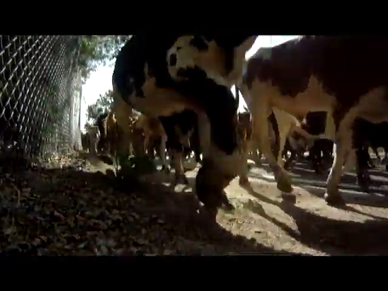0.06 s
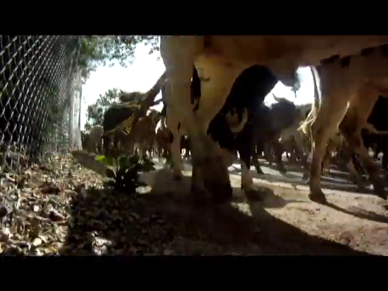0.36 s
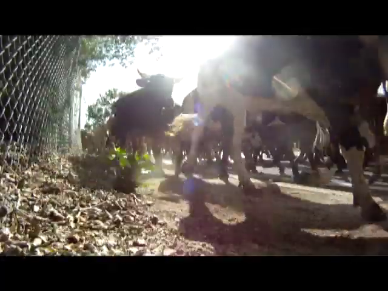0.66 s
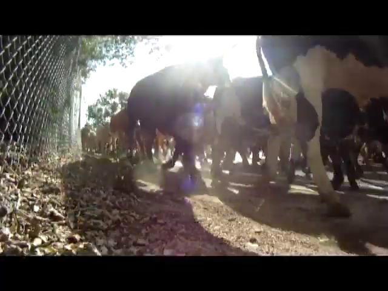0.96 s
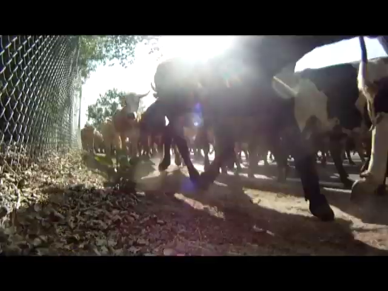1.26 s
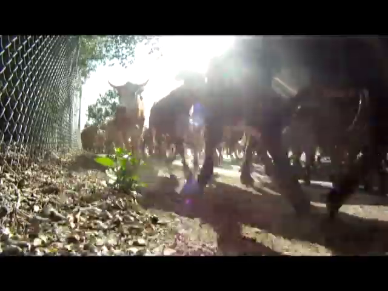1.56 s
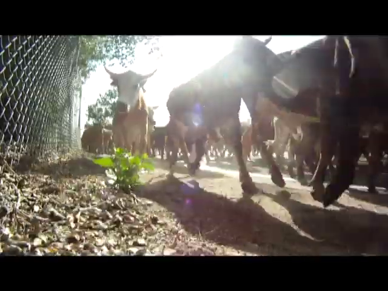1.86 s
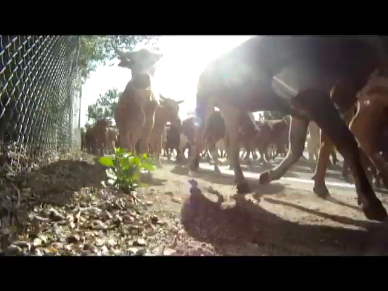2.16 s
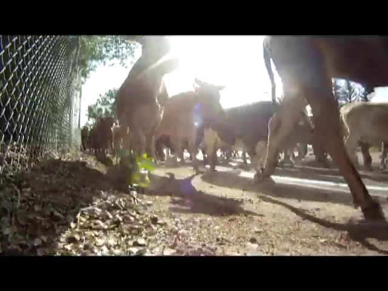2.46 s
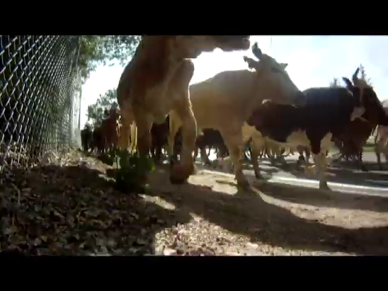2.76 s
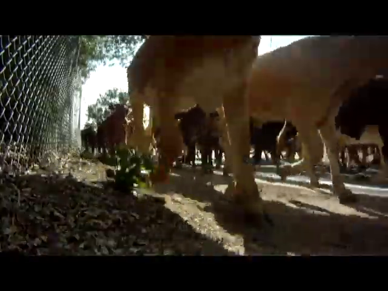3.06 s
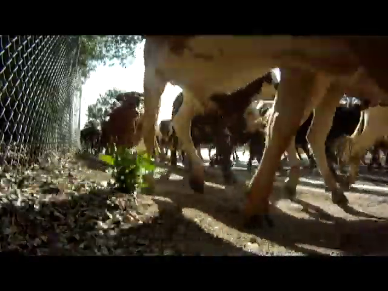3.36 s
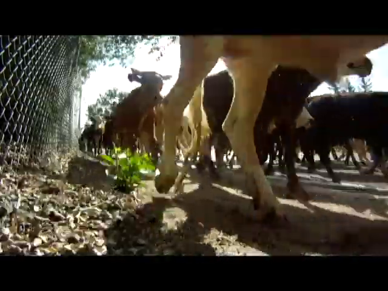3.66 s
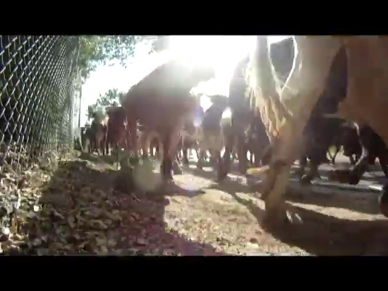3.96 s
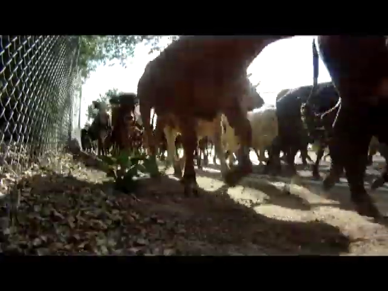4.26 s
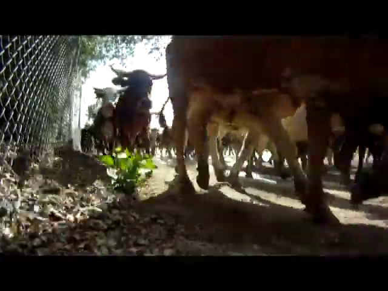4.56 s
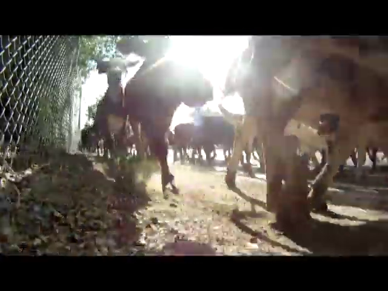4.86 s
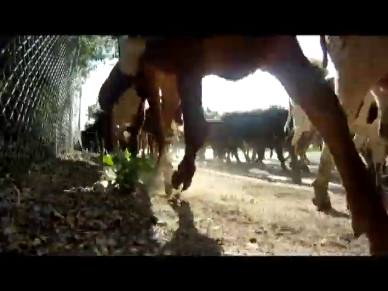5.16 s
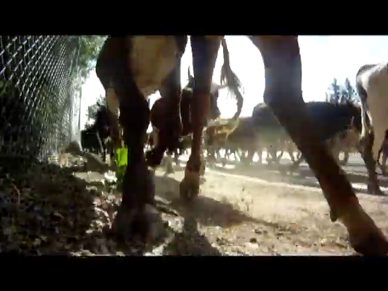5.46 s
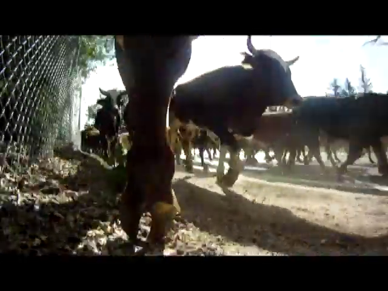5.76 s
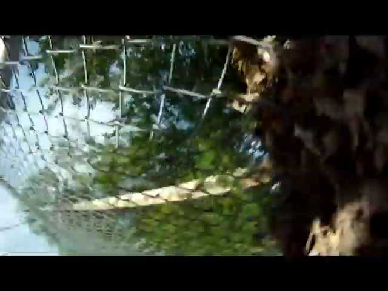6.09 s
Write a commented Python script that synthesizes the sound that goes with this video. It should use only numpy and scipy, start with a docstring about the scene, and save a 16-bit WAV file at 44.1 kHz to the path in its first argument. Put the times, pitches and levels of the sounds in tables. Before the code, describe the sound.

A herd of cattle streams past a microphone lying on the ground at a roadside. Near hooves thud into the soil and clack and crunch on grit, while many more clatter on the pavement behind and the ground rumbles. At the very end a hoof kicks the microphone: its case knocks loudly, a fence wire hums briefly and dry leaves crackle against it.

```python
"""Steers passing a roadside camera

A herd of steers streams past a small cased camera lying on the ground. Near hooves thud through the
soil and clack on grit; the rest of the herd clatters on the pavement behind, and the ground trembles.
At the end a hoof kicks the camera: it tumbles against a wire fence and slides through dry leaves."""
import sys
import numpy as np
from scipy import signal
from scipy.fft import rfft, irfft, next_fast_len
from scipy.io import wavfile
from scipy.ndimage import uniform_filter1d, map_coordinates

SR = 44100
rng = np.random.default_rng(int(sys.argv[2]) if len(sys.argv) > 2 else 0)


def store_wav(level_fs):
    """Save 16-bit WAV to argv[1]."""
    pcm = np.round(np.clip(np.atleast_2d(level_fs), -1, 1) * 32767)
    wavfile.write(sys.argv[1], SR, pcm.T.astype(np.int16))


N = 279153


# a near steer's weight landing on the soil: t/s, level/dB, f/Hz, heel bump/dB
FOOTFALLS = [(0.101, -32.5, 106, -44), (0.162, -28.5, 70.6, -62), (0.272, -31, 87, -58),
             (0.354, -25.5, 105, -32.5), (0.429, -33, 87.5, -50), (0.608, -23, 83, -37.5),
             (0.767, -28, 83.4, -66), (0.978, -29.5, 72, -46), (1.072, -27.5, 92, -56),
             (1.117, -30, 81.6, -62), (1.312, -31.5, 70, -65), (1.413, -29, 90, -44),
             (1.706, -26.5, 100, -43.5), (1.814, -25, 91.4, -59), (2.018, -24, 87, -39.5),
             (2.059, -25.5, 89, -56), (2.31, -33.5, 91, -43.5), (2.633, -29, 92.3, -44.5),
             (2.956, -32, 81, -48), (3.132, -28.5, 72, -51), (3.25, -28.5, 85, -54),
             (3.463, -24.5, 108.5, -30), (3.616, -37, 91, -41), (3.784, -32.5, 90, -51),
             (4.028, -42, 103, -34.5), (4.284, -23, 93, -49), (4.428, -29, 80.5, -68),
             (4.574, -28, 78.5, -43), (4.878, -26.5, 105.5, -41), (4.986, -21.5, 89, -33.5),
             (5.209, -32.5, 104, -41), (5.318, -23, 68.5, -33.5), (5.579, -24.5, 58, -48),
             (5.644, -33, 101, -31.5), (5.892, -26.5, 80, -32.5), (5.952, -27, 59, -34)]

def thuds(far_steps_per_s=9, far_db=-35.5):
    """The soil carries each footfall as a short, low wave that swells and sinks in pitch."""
    track = np.zeros(N)
    t = np.arange(-SR // 20, SR // 10) / SR
    # animals farther off add softer steps at uneven times
    count = int(far_steps_per_s * N / SR)
    farther = [((k + 0.301 * late) / far_steps_per_s, far_db + 3 * weight, 80 + 12 * pitch, far_db - 17)
               for k, (late, weight, pitch) in enumerate(rng.standard_normal((count, 3)))]
    for s, db, hz, heel_db in list(FOOTFALLS) + farther:
        swell = 2 / (np.exp(-t / 0.0071) + np.exp(t / 0.0089))
        wave = swell * np.sin(2 * np.pi * (hz * (t - 3.4 * t ** 2) + rng.random()))
        # the heel gives a shorter, higher bump
        heel_cycles = rng.uniform(142, 206) * (t - 3 * t ** 2) + rng.random()
        bump = np.exp(-(t / 0.0081) ** 2) * np.sin(2 * np.pi * heel_cycles)
        add(track, s + t[0], amp(db) * wave + amp(heel_db) * bump)
    return track


# near hooves striking: t/s, level/dB, hoof's ring f/Hz, hollow knock/dB, stony brightness/dB
HOOF_STRIKES = [(0.0826, -42, 2360, -19, -5), (0.1223, -45.5, 2020, 0, 7), (0.1735, -44, 2600, 4, 4.5),
                (0.2095, -34, 2010, -10, 0), (0.3379, -36, 2320, -2, 10.5), (0.3773, -47, 2400, 4, 19),
                (0.4574, -45, 2180, -15, 1), (0.5781, -37.5, 2100, 0, -4), (0.7357, -48, 2430, -8, -5),
                (0.8786, -38, 2260, 13.5, -5), (0.9225, -46, 1930, -7, -7), (1.057, -37.5, 2080, 7, 3),
                (1.1428, -37.5, 2290, 0, 1), (1.257, -45, 1710, -15, 4), (1.5872, -34.5, 2330, -7, 7),
                (1.7903, -44, 2130, -19, -14), (2.068, -38, 2440, -2, 0), (2.1032, -38.5, 1520, -2, -1),
                (2.3637, -32.5, 2530, -16, 2), (2.4229, -36, 2050, -20, -6), (2.4877, -43, 2320, 1, 6),
                (2.635, -42.5, 2000, -15, 4), (2.7106, -38.5, 2040, -16, 0), (2.9118, -43, 2300, -4, 3),
                (3.0793, -41.5, 1960, -21, -7), (3.1407, -43, 1750, -8, -10),
                (3.2889, -45.5, 2260, -11, -9), (3.3872, -45, 2090, 1, -3), (3.4296, -39, 2100, 0, -4),
                (3.5294, -47, 2380, -14, 8), (3.5907, -43.5, 2300, -9, 3), (3.7594, -41, 2480, -5, 1),
                (3.9574, -45, 2400, -5, 4), (4.0153, -45.5, 2120, -22, 5), (4.1318, -44, 2040, -20, -4),
                (4.2297, -36.5, 1850, -7, -10), (4.276, -40.5, 2400, -9, -3), (4.4076, -38.5, 1800, -15, 6),
                (4.6994, -44, 1920, -6, -11), (4.811, -37.5, 2400, -5, -11), (4.849, -45, 1820, -11, -7),
                (5.0056, -45.5, 1710, -13, 5), (5.2545, -42.5, 2000, -11, 7), (5.2923, -39, 2280, 7, 3),
                (5.466, -41, 2700, 2, 18), (5.518, -41.5, 1620, -3, 11), (5.6818, -40, 1530, -2, -1),
                (5.859, -46, 1900, -15, 12)]

def near_hooves(soft_step_db=-41):
    """Single steps close by sound hollow on soil and bright on stones."""
    track = np.zeros(N)
    for s, db, ring_hz, knock_db, bright_db in HOOF_STRIKES:
        # a loud, bright step on stone crunches less than one on loose grit
        crunch_db = 2.5 - 1.5 * (db - soft_step_db) - 0.9 * max(bright_db, 0)
        step = hoof(ring_hz, knock_db, bright_db, crunch_db, fade_s=0.013, second_toe_db=-11.5)
        add(track, s, amp(db) * step)
    return track


def hoof(ring_hz, knock_db, bright_db, crunch_db, fade_s, second_toe_db):
    """One step: the two hard toes of a split hoof land in turn, and grit crunches under them."""
    t = np.arange(SR // 12) / SR
    grains = np.repeat(rng.standard_normal(len(t)), SR // 900)[:len(t)]
    crunch = amp(-60 * t / 0.18 + 2.2 * grains) * rng.standard_normal(len(t))
    force = amp(crunch_db) * crunch / np.linalg.norm(crunch)
    add(force, 0, contact(fade_s))
    add(force, rng.uniform(0.0024, 0.009), amp(second_toe_db) * contact(fade_s))
    ring = lambda hz: 1 + 2.5 * resonance(hz, ring_hz, 187)
    # the ground's tone: f/Hz, level/dB
    ground = [(150, knock_db - 4), (400, knock_db), (1000, knock_db), (1500, 0.0026), (3000, 0.029),
              (5500, bright_db), (7500, bright_db), (10000, bright_db * 0.043)]
    step = coloured(force, lambda hz: clatter_tone(hz) * ring(hz) * tone(ground, hz))
    power = uniform_filter1d(step ** 2, SR // 300)
    return step / np.sqrt(power.max())


# blows on the case, levels before its tone is added: t/s, crack/dB, hollow knock/dB, shove/dB, contact/s
BLOWS = [(5.9681, -18, -19, 3, 0.0068), (5.9696, 4, 0.5, -3.5, 0.002), (5.9719, -17, 7.5, -30, 0.0049),
         (6.0448, -19, -11, -1, .0026), (6.0542, -25.5, -13, -8, 0.00064), (6.0816, -6, -3, -1, .0011),
         (6.0902, -17.5, -29, -4.5, 0.00057), (6.165, -41, -41, -31, .0015),
         (6.184, -31, -32, -21, 0.00066), (6.222, -50, -45, -15, 0.0087), (6.247, -19, -25, -29, .0006),
         (6.266, -22.5, -35, -43, 0.0005), (6.324, -20, -19, -18, 0.001)]
# the tone of the case's hard shell: f/Hz, level/dB
SHELL_TONE = [(30, 3), (250, -6.5), (410, -8.5), (740, -1), (1100, 0), (2000, 3.5), (2750, -2),
              (4400, -9.5), (6200, -22.5), (7800, -13), (9400, -7.5), (11000, -14), (12000, -37),
              (13000, -15)]
# the notes the shell rings at: f/Hz, width/Hz, level/dB
SHELL_NOTES = [(265, 79, -29), (710, 79, 3), (1870, 360, -5.5), (2658, 195, 3.5), (3670, 690, -10.5),
               (9240, 160, -6)]
# the tone of the air inside the case: f/Hz, level/dB
HOLLOW_TONE = [(40, -16), (140, 3), (290, 5), (410, -11), (560, 2), (850, 3), (1150, -8.5), (2500, -27.5),
               (8000, -41)]

def tumbling_case(fade_s=0.012, tap_s=0.00097):
    """Blows shove the case and knock on the air inside; both blows and leaves make its shell ring."""
    cracks, rings, knocks, shoves = np.zeros((4, N))
    t = np.arange(SR // 10) / SR
    strength = np.sqrt(SR * fade_s / np.log(1e6))
    for s, crack_db, knock_db, shove_db, contact_s in BLOWS:
        crack = amp(crack_db) * strength * contact(fade_s)
        add(cracks, s, crack)
        # a long press muffles the shell; a quick tap lets it ring
        ring_db = 5.5 - 26 * np.log10(contact_s / tap_s)
        add(rings, s, amp(ring_db) * crack)
        add(knocks, s, amp(knock_db) * strength * contact(fade_s))
        add(shoves, s, -amp(shove_db) * np.sin(np.pi * t / contact_s) * (t < contact_s))
    hollow = amp(12.5) * coloured(knocks, lambda hz: tone(HOLLOW_TONE, hz))
    # the microphone cannot hold a steady push, so each shove swings back
    shoves = signal.lfilter(*signal.butter(1, 32, "highpass", fs=SR), shoves)
    rasp = dry_leaves()
    shell = amp(11) * coloured(cracks + rasp, lambda hz: tone(SHELL_TONE, hz) + amp(1.5) * window(hz))
    notes = lambda hz: sum(amp(db) * resonance(hz, centre, width) for centre, width, db in SHELL_NOTES)
    ring = amp(9.5) * coloured(rings + rasp, notes)
    return shell + ring + hollow + shoves


# how hard the leaves scrape the case: t/s, level/dB
LEAF_SCRAPE = [(6.155, -90), (6.176, -44.5), (6.186, -26.5), (6.25, -24), (6.28, -43.5), (6.318, -36.5),
               (6.33, -22.5)]

def dry_leaves():
    """Leaves snap in clumps as the case drags over them."""
    snaps = rng.standard_normal(N) * amp(1.6 * wobble(1200) + 2.2 * wobble(220))
    return loudness(LEAF_SCRAPE) * unit(snaps)


# the hum of the fence wire: t/s, level/dB
WIRE_HUM = [(6.04, -119), (6.055, -20), (6.11, -46), (6.135, -36.5), (6.18, -32.5), (6.33, -42)]

def fence_wire():
    """The struck wire hums on one slightly wavering note."""
    hz = 203 + 5 * wobble(30)
    return loudness(WIRE_HUM) * np.sin(2 * np.pi * np.cumsum(hz) / SR)


def far_hooves(count=720, kinds=120, base_db=-52.5):
    """Hundreds of steps on the pavement blur into a clatter over a wash of scuffing."""
    steps = [hoof(1500 + 1300 * pitch, knock_db=-0.33, bright_db=9 * (hardness - 0.6),
                  crunch_db=1.5, fade_s=0.016, second_toe_db=1)
             for pitch, hardness in rng.random((kinds, 2))]
    clatter = np.zeros(N)
    for k, (late, nearness, kind) in enumerate(rng.random((count, 3))):
        s = (k + 2 * late) / count * N / SR
        add(clatter, s, amp(14.7 * nearness) * steps[int(kind * kinds)])
    scuffing = unit(coloured(rng.standard_normal(N), clatter_tone)) * amp(0.46 * wobble(25))
    # the level sways a little, as when steps bunch up and thin out
    return amp(base_db + 0.24 * wobble(9)) * (unit(clatter) + amp(-5) * scuffing)


# the tone of the trembling soil: f/Hz, level/dB
SOIL_TONE = [(10, -30), (18, -22), (28, 2.5), (45, -10), (65, 6.5), (90, -6), (120, -6), (150, -17),
             (200, -22.5), (300, -29), (800, -48.5), (2000, -120)]

def ground_rumble(steady_db=-45.5, shake_db=-18, shake_s=0.04):
    """The ground trembles in surges under the herd, most of all around each near footfall."""
    t = np.arange(N) / SR
    tremor = unit(coloured(rng.standard_normal(N), lambda hz: tone(SOIL_TONE, hz)))
    shaking = sum(amp(db + shake_db) ** 2 * np.exp(-((t - s) / shake_s) ** 2) for s, db, *_ in FOOTFALLS)
    surges = amp(4.5 * wobble(28))
    return np.sqrt(amp(steady_db) ** 2 + shaking) * surges * tremor


# the broad tone of hooves heard through the case: f/Hz, level/dB
CLATTER_TONE = [(300, -15.5), (780, -6.5), (950, -12), (1600, -3), (2250, -1), (3300, -11), (4400, -17.5),
                (5100, -20.5), (6000, -33), (7000, -26.5), (8300, -19.5), (9800, -9.5), (11200, -30.5),
                (13000, -22)]
# narrow bands that the case lifts or lowers: f/Hz, width/Hz, change/dB
CASE_BANDS = [(2160, 84, 1.5), (3220, 69, 9.5), (3660, 140, 5), (5260, 220, 6), (6770, 580, 8.5),
              (8270, 140, 3.5), (10200, 200, 3.5), (15200, 170, -10)]

def clatter_tone(hz):
    """The case lets some pitches of the clatter through better than others."""
    change_db = sum(db * resonance(hz, centre, width) for centre, width, db in CASE_BANDS)
    return (tone(CLATTER_TONE, hz) + window(hz)) * amp(change_db)


# the note of the case's window: f/Hz, width/Hz, level/dB
WINDOW_NOTE = (14400, 250, -14)

def window(hz):
    """The window in the case rings at a very high pitch."""
    centre, width, db = WINDOW_NOTE
    return amp(db) * np.exp(-0.5 * ((hz - centre) / width) ** 2)


def contact(fade_s, size=2048):
    """A brief, rough tap of energy 1: noise that drops about 60 dB in fade_s."""
    t = np.arange(size) / SR
    spectrum = rfft(rng.standard_normal(size) * amp(-60 * t / fade_s))
    evened = irfft(spectrum / np.sqrt(np.abs(spectrum)))
    tap = evened * (1 - (t / t[-1]) ** 2) ** 2
    return tap / np.linalg.norm(tap)


def resonance(hz, centre, width):
    """How strongly a ringing thing answers each frequency: 1 at its own note."""
    return 1 / (1 + (2 * (hz - centre) / width) ** 2)


def coloured(x, gain):
    """Scale each frequency of x by gain(hz), so that ringing only ever follows its cause."""
    size = 2 * next_fast_len(len(x))
    gains = np.maximum(gain(np.fft.rfftfreq(size, 1 / SR)), 1e-6)
    cepstrum = irfft(np.log(gains), size)
    # move the filter's early half to after the hit
    cepstrum[1:size // 2] *= 2
    cepstrum[size // 2 + 1:] = 0
    return irfft(rfft(x, size) * np.exp(rfft(cepstrum)), size)[:len(x)]


def tone(points, hz):
    """Join (f/Hz, level/dB) points into a gain for each frequency."""
    f, db = np.transpose(points)
    return amp(np.interp(np.log(hz + 1), np.log(f + 1), db))


def loudness(points):
    """Join (t/s, level/dB) points into a gain for each sample."""
    s, db = np.transpose(points)
    return amp(np.interp(np.arange(N) / SR, s, db))


def wobble(rate):
    """A smooth curve through rate random values a second."""
    return map_coordinates(rng.standard_normal(int(N * rate / SR) + 4), [np.arange(N) * rate / SR])


def amp(db):
    """Turn decibels into a gain, the number to multiply a sound by."""
    return 10 ** (np.asarray(db) / 20)


def unit(x):
    """Scale x to an average power of 1."""
    return x / np.sqrt(np.mean(x ** 2) + 1e-20)


def add(track, s, sound):
    """Mix a sound into the track, starting at s seconds."""
    start = int(np.clip(round(s * SR), 0, N))
    track[start:start + len(sound)] += sound[:N - start]


def scene():
    """One microphone hears everything, so both channels are alike."""
    herd = near_hooves() + far_hooves() + thuds() + ground_rumble()
    # once kicked off the ground, the camera picks up slightly less of the herd
    kick_s = BLOWS[0][0]
    lifted = np.clip((np.arange(N) / SR - kick_s) / 0.02, 0, 1)
    mono = amp(-0.5 * lifted) * herd + tumbling_case() + fence_wire()
    return np.array([mono, mono])


def record(dry):
    """The kicks overload the microphone's input, and the very highest treble is cut away."""
    overloaded = np.clip(dry, -1, 1)
    treble_cut = signal.ellip(10, 0.1, 80, 15400, fs=SR, output="sos")
    return signal.sosfilt(treble_cut, overloaded)


dry = scene()
out = record(dry)
store_wav(out)
```